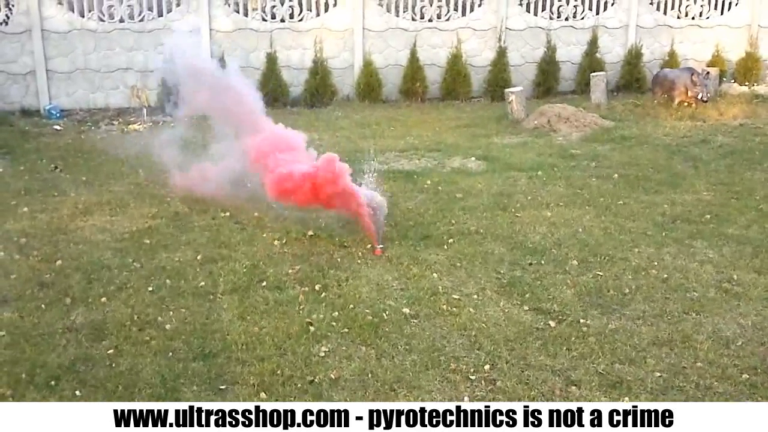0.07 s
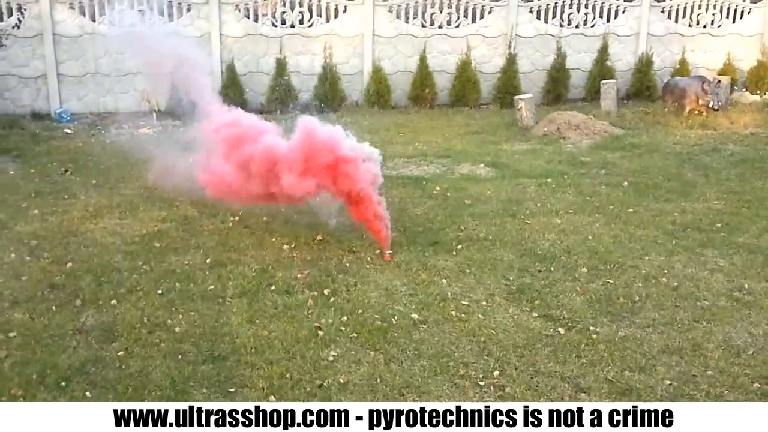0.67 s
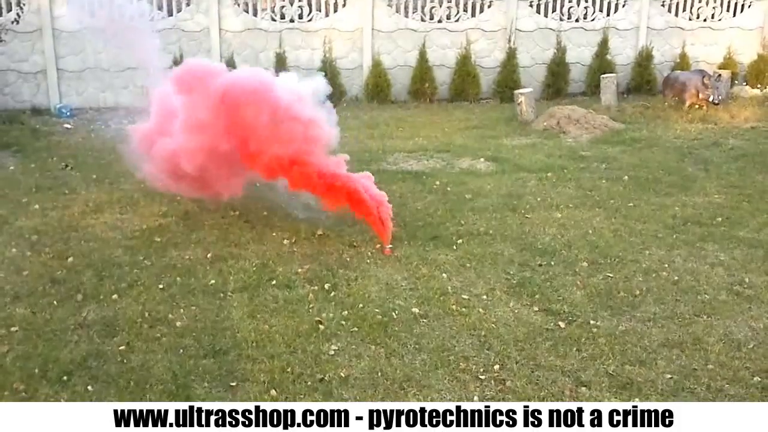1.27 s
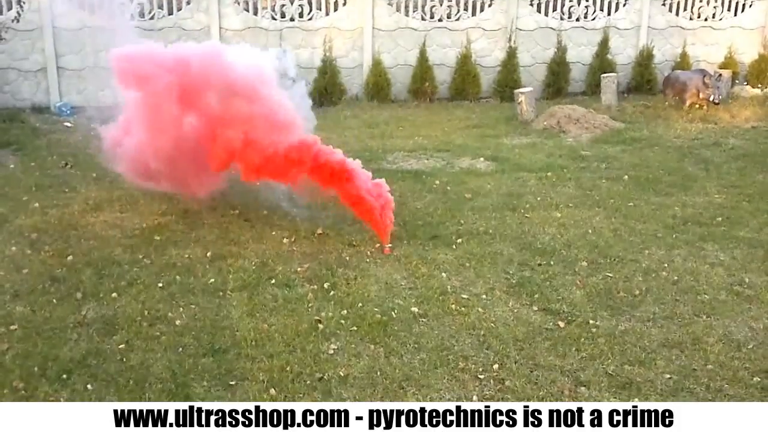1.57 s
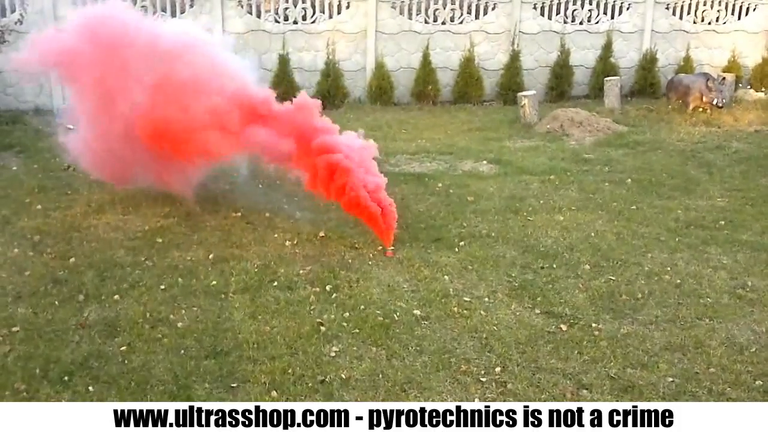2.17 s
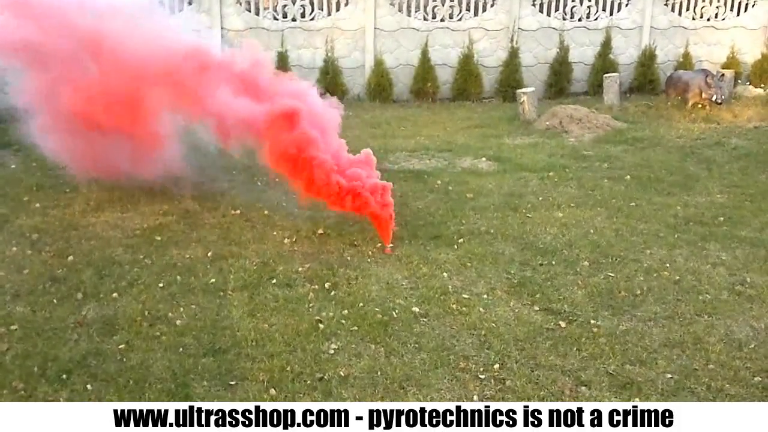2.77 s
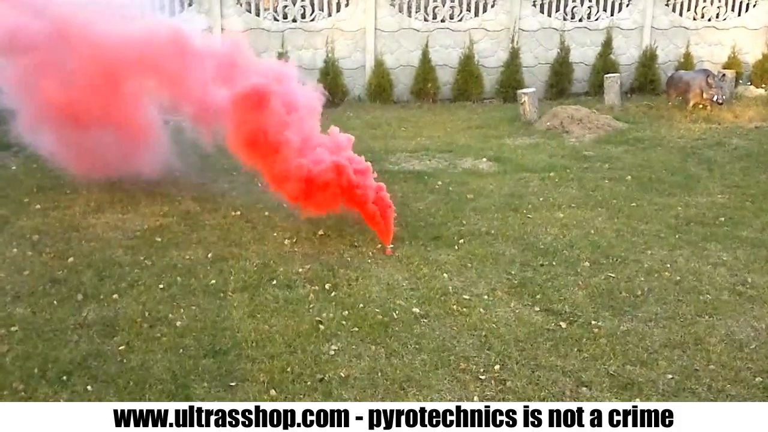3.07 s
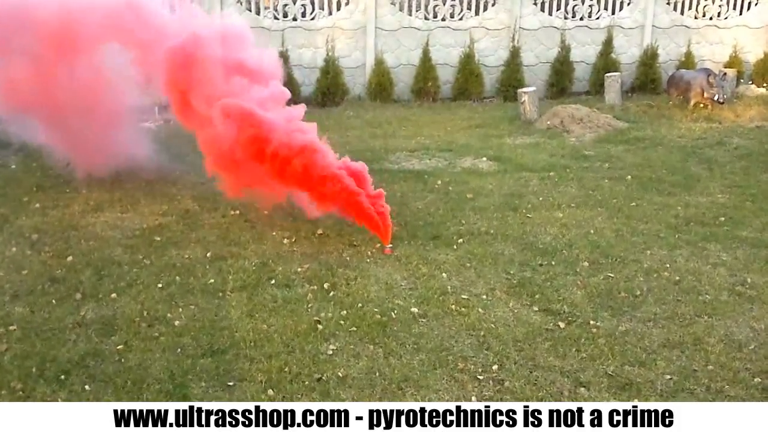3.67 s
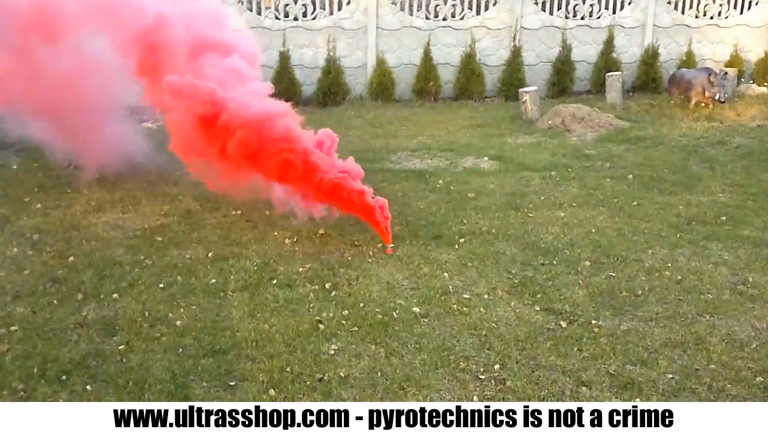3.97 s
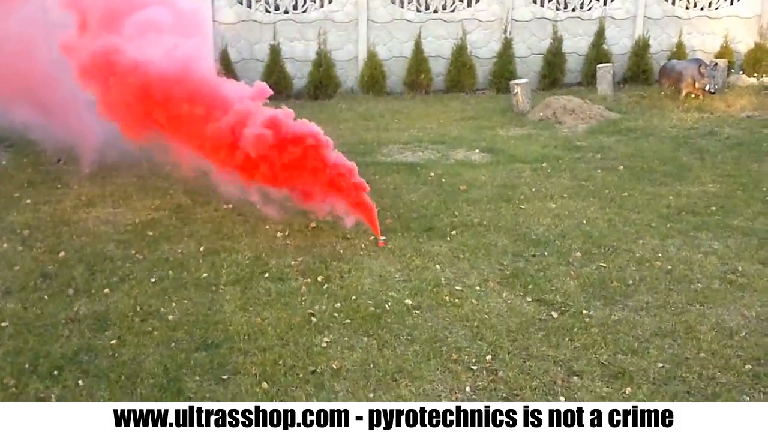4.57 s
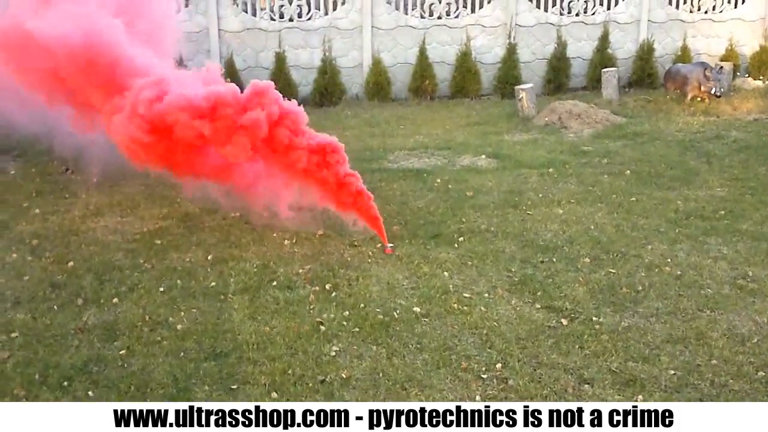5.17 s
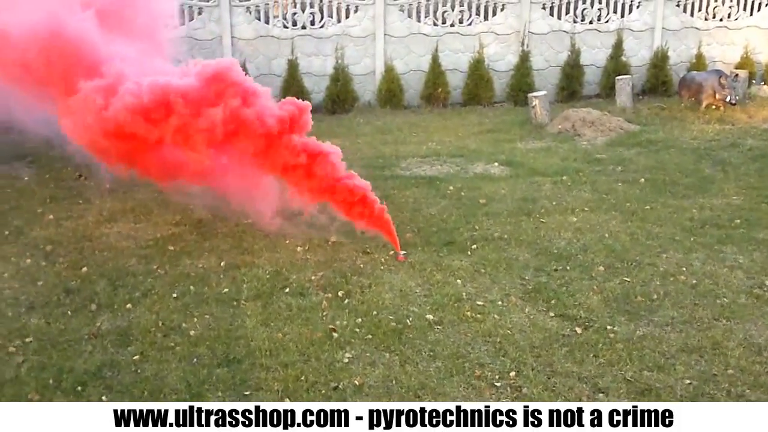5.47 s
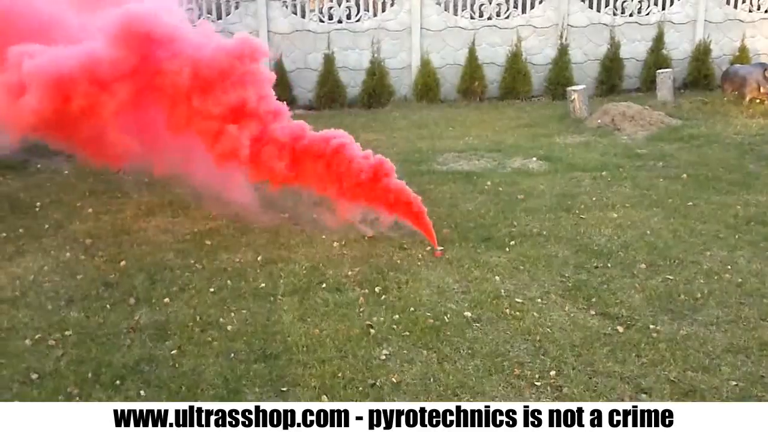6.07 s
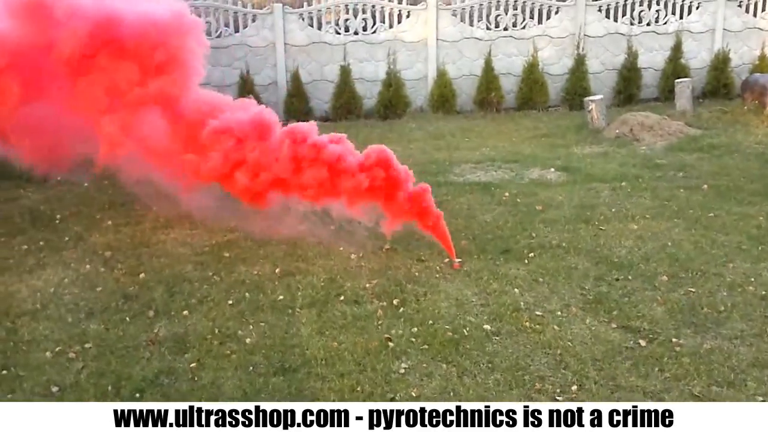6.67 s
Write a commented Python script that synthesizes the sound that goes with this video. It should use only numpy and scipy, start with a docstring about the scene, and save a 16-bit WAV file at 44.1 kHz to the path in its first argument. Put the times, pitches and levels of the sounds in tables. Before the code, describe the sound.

Outdoors in a light breeze, a smoke bomb fizzes sharply, fades to faint spurts, then starts a steady, rushing hiss.

```python
"""A garden lawn, with a smoke bomb burning a few metres from a stereo microphone.
Its priming flares with a bright rush and dies into a thin, sputtering hiss in the vent hole;
then the charge builds pressure and the smoke jets out steadily. Garden walls send back faint echoes,
and a breeze bumps the two microphone ports over far traffic and a low, wavering hum near 57 Hz."""
import sys
import numpy as np
from scipy import signal
from scipy.fft import rfft, irfft
from scipy.io import wavfile
from scipy.ndimage import uniform_filter1d

SR = 44100
rng = np.random.default_rng(int(sys.argv[2]) if len(sys.argv) > 2 else 0)


def pcm_store(signal):
    """Save signal as 16-bit PCM."""
    levels = np.round(np.clip(np.atleast_2d(signal), -1, 1) * 32767)
    wavfile.write(sys.argv[1], SR, levels.astype(np.int16).T)


N = 305172
SIZE, HOP = 1024, 256  # spectral frame and step, in samples
HZ = np.fft.rfftfreq(SIZE, 1 / SR)
TIMES = np.arange(N // HOP + 5) * HOP / SR
SURGE_RISE_DB_PER_S = 97  # the priming's surge and the vent's ring share this attack

# the band in which burning gas roars: f/Hz, half width/Hz, weight
ROAR_BAND = [(646, 620, 1)]
# the jet is weaker at the right port: f/Hz, gain/dB
JET_RIGHT = [(200, -7), (900, -9), (2000, -8.5), (3700, -7), (4900, -3.5), (6000, -8.5), (7000, -3.5),
             (8200, -9)]


def jet(hole_db=7.5, hole_width_hz=440, widening_hz=130, sputter_db=.34):
    """The full jet: wide hiss that rings the hole and sharpens with pressure, over a surging roar."""
    # tone of the jet: f/Hz, level/dB
    spectrum = [(60, -7.5), (330, -3.5), (800, 0.3), (1400, 2.5), (2400, 2.5), (3600, -0.5), (5100, 0.5),
                (5900, -4), (7000, -12), (8500, -18), (11800, -17.5), (12600, -49), (15000, -26.5)]
    # the uneven burn surges and slackens: t/s, half width/s, hiss/dB, roar/dB
    surges = [(4.2, 0.034, -0.5, -1.5), (4.322, 0.022, 0.5, -1), (4.44, 0.039, -0.1, 3.5),
              (4.68, .03, 0, -1.5), (4.93, 0.033, 0, 4.5), (5.07, 0.022, -0.5, 0.5), (5.16, 0.058, 1.5, 5),
              (5.26, .03, 1.5, -2), (5.417, 0.049, 1, 3.5), (5.86, .1, 1, -1), (6.017, 0.023, 1.6, 3.5),
              (6.13, 0.052, 1, 0.5), (6.3, 0.038, 0, 3), (6.514, 0.04, 0.3, -6.5), (6.756, .05, 0.5, 2.5)]
    # the hole's ring under the jet: t/s, f/Hz
    hole_pitch = [(4.3, 3700), (4.55, 3620), (4.8, 3300), (5.3, 3420), (5.7, 3520), (5.95, 3550),
                  (6.4, 3600), (6.7, 3650), (6.87, 3830)]
    built = np.interp(TIMES, [4.28, 5.9], [0, 1])[:, None]
    pressure = built + .62 * bell(4.31, .15)  # pent-up pressure escapes as the jet opens
    level_db = -44.5 + 3.5 * built + held(4.205, 6.82, rise_db_per_s=186, fall_db_per_s=56)
    level_db += sum(hiss * bell(s, width) for s, width, hiss, _ in surges)
    level_db += sputter_db * flutter(6, 45)
    hole_hz = np.interp(TIMES, *np.transpose(hole_pitch))[:, None]
    ring = bumps([(hole_hz, hole_width_hz + widening_hz * built, hole_db * pressure)])
    edge = bumps([(4950, 480, 3 * built), (6100, 650, 6.5 * built)])
    roar_db = sum(roar * bell(s, width) for s, width, _, roar in surges) + .6 * flutter(5, 20)
    colour = curve(spectrum) + ring + edge + roar_db * bumps(ROAR_BAND)
    colour += dulling(level_db, full_db=-45, slope=.4)
    return turbulence(colour, level_db, right_db=curve(JET_RIGHT), patchy_db=1.1, focus=1.03)


def flare(fall_db_per_s=70, flicker_db=.46, spit_db=1, fizz_db=2, roar_db=6):
    """The priming burns fiercely, gulps, surges once and dies away; tiny spits roughen its rush."""
    # tone of the burning priming: f/Hz, level/dB
    spectrum = [(60, -15.5), (330, -14.5), (800, -7.5), (1400, -9.5), (2400, -8), (3600, -0.5),
                (4800, -2.5), (6300, -17), (8500, -20.5), (12200, -25.5), (12900, -75)]
    # upper resonance of the opening fizz: f/Hz, half width/Hz, weight
    fizz_ring = [(4700, 270, 0.65)]
    # the last embers flare up: t/s, level/dB
    embers = [(.85, -49), (.925, -53)]
    burn_db = -32.5 + fading(.27, fall_db_per_s)
    surge_db = -27 + held(.41, .46, SURGE_RISE_DB_PER_S, fall_db_per_s)
    embers_db = [db + held(s, s, 155, 155) for s, db in embers]
    level_db = np.max([burn_db, surge_db, *embers_db], axis=0)
    colour = curve(spectrum) + dulling(level_db, full_db=-39, slope=.55)
    treble = HZ ** 8 / (HZ ** 8 + 4420 ** 8)
    fizz = fizz_db * bell(.071, .15) * (treble + bumps(fizz_ring))
    catch = bell(.13, .036) - bell(.058, .036)  # the roar ducks, then swells as the priming catches
    roar = roar_db * catch * bumps(ROAR_BAND)
    level_db += flicker_db * flutter(20, 70)
    rush = turbulence(colour + fizz + roar, level_db, right_db=-3.5, patchy_db=1, focus=1.08)
    spits = noise(lambda f: lowpass_db(f, 400))
    gulp_db = -3 * np.exp(-((np.arange(N) / SR - .362) / .0036) ** 2)
    return rush * gain_of(gulp_db - spit_db * spits)


def vent(leak_db=-71.5, full_flow_db=-55, flicker_db=.45):
    """A weak, uneven flow sounds the hole's broad resonance; it chokes, clogs and comes in spurts."""
    # resonance of the hole at full flow: f/Hz, level/dB
    spectrum = [(300, -14), (1500, -23), (2600, -20), (3050, -10), (3450, -2.5), (3720, 0.5), (4150, -7),
                (4650, -21), (5100, -34), (9000, -47)]
    # slag blocks the hole for a moment: t/s, depth/dB
    chokes = [(1.11, 6.5), (1.21, 3.5), (2.04, 9), (2.11, 11)]
    # gas breaks through the slag: t/s, level/dB, attack/(dB per s)
    spurts = [(2.15, -46, 600), (2.59, -57.5, 300), (2.798, -54, 148), (2.93, -61.5, 150),
              (3.24, -63.5, 90), (3.32, -61, 120), (3.38, -62.5, 90)]
    ring_db = -39.5 + held(.49, .64, SURGE_RISE_DB_PER_S, fall_db_per_s=88)
    hiss_db = -50.5 + fading(1.9, 10) + fading(2.502, 280)  # slag narrows the hole, then clogs it
    hiss_db -= sum(db * bell(s, .028) for s, db in chokes)
    spurts_db = [db + held(s, s, rise, fall_db_per_s=480) for s, db, rise in spurts]
    level_db = np.maximum(np.max([ring_db, hiss_db, *spurts_db], axis=0), leak_db)
    pitch = 1 + .005 * np.minimum(level_db - full_flow_db, 0)  # the ring goes flat in a weak flow
    level_db += flicker_db * flutter(7, 60)
    return turbulence(curve(spectrum, HZ / pitch), level_db, right_db=-5, patchy_db=2, focus=.85)


def puff(start_s=.522, attack_s=.0017, decay_s=.017, dull_hz=1800):
    """One dull spurt as the priming gives out."""
    age = np.maximum(np.arange(N) / SR - start_s, 0)
    level_db = np.full((len(TIMES), 1), -32)
    gas = turbulence(lowpass_db(HZ, dull_hz), level_db, right_db=-3, patchy_db=1, focus=1.1)
    return gas * np.minimum(age / attack_s, 1) * np.exp(-age / decay_s)


def opening(give_way_s=4.18, fall_db_per_s=120):
    """A thin leak grows and the first smoke wells up; both give way to the jet."""
    # the thin, high leak: f/Hz, level/dB
    leak_colour = [(1000, -30), (1700, -4), (2200, 0), (2900, -16), (4000, -6), (5000, -7), (6000, -4),
                   (7500, -14), (12000, -19)]
    # the dull rush of welling smoke: f/Hz, level/dB
    well_colour = [(150, -10), (480, 0), (900, -5), (1300, -7), (2150, -6), (3200, -16), (7000, -33)]
    leak_db = -66 + held(3.97, give_way_s, 30, fall_db_per_s)
    well_db = -56 + held(4.1, give_way_s, 90, fall_db_per_s)
    return sum(turbulence(curve(colour), level_db, right_db=curve(JET_RIGHT), patchy_db=0, focus=1)
               for colour, level_db in [(leak_colour, leak_db), (well_colour, well_db)])


def walls(x):
    """Single echoes off the ground and the garden walls comb the hiss."""
    # reflections: delay/s, gain/dB
    echoes = [(.00174, -18), (.0025, -20), (.0142, -15), (.0155, -14), (.0376, -17.5)]
    return x + sum(gain_of(db) * np.pad(x, ((0, 0), (round(s * SR), 0)))[:, :N] for s, db in echoes)


def wind(buffet_boost_db=3, right_db=-5, lumpy_db=4.5):
    """Eddies strike one port at a time over a lumpy breeze that rises to one gust and eases."""
    # strong buffets: t/s, half width/s, level before boost/dB, eddy f/Hz, port (+1 left, -1 right)
    buffets = [(0.01, 0.038, -36.5, 65.6, 1), (0.09, 0.05, -38, 61.4, -1), (0.121, 0.033, -31, 50.7, 1),
               (0.176, 0.029, -36.5, 65, 1), (0.226, 0.041, -29, 80, 1), (0.277, 0.026, -29, 80.5, 1),
               (0.551, 0.03, -44, 62, -1), (.925, 0.024, -42, 55, 1), (0.992, 0.024, -39.5, 64, 1),
               (1.039, 0.029, -40.5, 44, -1), (1.335, 0.035, -41.5, 72, -1), (1.567, 0.035, -38, 66, 1),
               (1.644, 0.028, -39, 64, 1), (1.84, .035, -43, 66.5, 1), (1.975, 0.027, -36.5, 54, 1),
               (2.239, 0.026, -45, 55, -1), (2.338, 0.025, -43, 68, 1), (2.599, 0.04, -43, 50.3, 1),
               (2.753, 0.038, -42.5, 47.7, 1), (2.924, .025, -42, 58, 1), (3.1, 0.029, -43, 62, 1),
               (3.504, .036, -42, 70, 1), (4.207, .035, -45, 46, 1), (4.55, .03, -44, 48, 1),
               (4.827, 0.04, -36.5, 50.3, 1), (5.124, 0.025, -40.5, 58, 1), (5.31, 0.024, -42, 55, 1),
               (5.495, 0.022, -39, 69.6, 1), (5.637, 0.021, -43, 71, 1), (5.698, 0.027, -39.5, 48, 1),
               (6.148, 0.03, -44.5, 56, 1), (6.467, 0.034, -41, 74, 1), (6.797, 0.041, -32.5, 42, 1),
               (6.869, 0.032, -43.5, 70, 1)]
    # rumble of a 75 Hz eddy: f/Hz, level/dB
    rumble = [(15, -15), (40, 0), (75, 4.5), (120, -7.5), (200, -17), (350, -28.5), (800, -40.5),
              (2500, -99)]
    t, out = np.arange(N) / SR, np.zeros((2, N))
    for s, width, db, eddy_hz, side in buffets:
        near = np.flatnonzero(abs(t - s) < 1.2 * width)
        swell = np.exp(-abs(1.38 * (t[near] - s) / width) ** 3)
        eddy = noise(lambda f: curve(rumble, f * 75 / eddy_hz), size=32768)
        buffet = unit_rms(swell * eddy[:len(near)]) * np.sqrt(np.mean(swell ** 2))
        out[int(side < 0), near] += gain_of(db + buffet_boost_db) * buffet
    breeze_db = -61 + 8.5 * bell(1.7, .77)
    for port, db in enumerate([0, right_db]):
        lumps_db = per_sample(breeze_db + lumpy_db * flutter(1.3, 13))
        out[port] += gain_of(db + lumps_db) * noise(lambda f: curve(rumble, f))
    return out


def thumps():
    """Small, tight eddies slap the left port: a dip of pressure between two soft rebounds."""
    # wind slaps: t/s, level before rounding/dB, width/s, rounding of the tip/s
    slaps = [(.207, -16, 0.0022, .0009), (.241, -14, 0.0029, .0009), (1.528, -23, 0.0039, .0022),
             (1.967, -18.5, .0036, 0.0035), (2.331, -32.5, 0.0014, .0008), (5.316, -25, .0028, .0022),
             (5.49, -32, 0.003, .0015), (5.635, -22.5, 0.0027, 0.0008), (6.467, -24, 0.0025, 0.0018),
             (6.792, -22, 0.0035, .0034)]
    t, out = np.arange(N) / SR, np.zeros((2, N))
    for s, db, width, tip in slaps:
        rounding = np.exp(-((np.arange(1025) - 512) / SR / tip) ** 2)
        offset = abs(t - s) / width
        slap = (offset - 1) * np.exp(-offset)
        out[0] += gain_of(db) * signal.oaconvolve(slap, rounding / rounding.sum(), "same")
    return out


def yard(level_db=-55):
    """A nearly steady bed of far traffic and air."""
    # tone of the open air: f/Hz, level/dB
    spectrum = [(20, -16), (45, 2), (80, -4.5), (130, -11.5), (200, -11), (350, -14.5), (800, -15.5),
                (1400, -16), (2400, -21), (3600, -27.5), (6000, -30), (8500, -33.5), (12000, -33.5),
                (13600, -47), (14200, -53)]
    swell_db = .35 * flutter(.3, 5)
    return turbulence(curve(spectrum), level_db + swell_db, right_db=-4, patchy_db=1.64,
                      focus=.88, direct=.74)


def hum(centre_hz=57, width_hz=7, right_db=-4.5):
    """A low, wavering hum of narrow-band noise, stronger on the left."""
    # the hum's fader ride: t/s, level/dB
    ride = [(0, -51.5), (2.2, -50.5), (3.0, -52), (3.45, -47.5), (3.85, -56), (4.15, -52.5), (4.5, -51),
            (6.9, -52)]
    shared, left, right = (noise(lambda f: -20 * np.log10(1 + ((f - centre_hz) / width_hz) ** 2))
                           for _ in range(3))
    level_db = np.interp(np.arange(N) / SR, *np.transpose(ride))
    return gain_of([level_db, level_db + right_db]) * unit_rms(shared + np.array([left, right]) / 2)


def turbulence(colour_db, level_db, right_db, patchy_db, focus, direct=1):
    """Patchy rushing noise at the two ports; focus scales their likeness, direct their colouring."""
    # peaks and dips of the left port: f/Hz, half width/Hz, gain/dB
    left_eq = [(970, 170, 2.5), (1234, 250, -4.5), (1737, 56, 2.5), (2605, 243, -5), (2928, 41, 5.5),
               (3306, 145, 3), (4340, 500, -1), (4760, 145, 5.5), (5120, 8.6, 3), (5870, 52, 6.5),
               (6880, 100, 2), (7850, 150, 0.5)]
    # peaks and dips of the right port: f/Hz, half width/Hz, gain/dB
    right_eq = [(830, 130, 2), (1180, 80, -4), (1830, 800, -7), (2370, 190, 3), (3040, 330, -10),
                (4200, 480, 2), (5850, 90, -5), (7500, 500, 4), (10200, 1200, -9)]
    # how alike the ports sound at focus 1: f/Hz, coherence
    likeness = [(400, .85), (900, .8), (1450, .44), (2450, .78), (3030, .3), (3300, .7), (3650, .86),
                (4380, .3), (4650, .78), (5000, .7), (5400, .33), (6200, .62), (7300, .33), (8500, .15)]
    # the left port's lead: f/Hz, phase/rad
    lead = [(500, 0), (1000, .6), (1550, .7), (2400, -.7), (2900, -3.1), (3080, .15), (3750, .1),
            (4150, 1.0), (4520, 4.15), (5000, 4.2), (5700, 7), (7200, 9.2)]
    left_re, left_im, apart_re, apart_im, patches = rng.standard_normal((5, len(TIMES), len(HZ)))
    patches = uniform_filter1d(patches, size=9, axis=0)  # smear in time, then in frequency
    patches = unit_rms(uniform_filter1d(patches, size=14, axis=1))
    coherence = np.clip(focus * curve(likeness), 0, .98)
    left, apart = left_re + 1j * left_im, apart_re + 1j * apart_im
    right = (coherence * left + np.sqrt(1 - coherence ** 2) * apart) * np.exp(-1j * curve(lead))
    left_port = gain_of(direct * bumps(left_eq))
    right_port = gain_of(direct * bumps(right_eq) + right_db)
    colour = gain_of(colour_db)
    colour /= np.linalg.norm(colour * left_port, axis=-1, keepdims=True)  # tone leaves the level alone
    spectra = np.array([left * left_port, right * right_port]) * colour * gain_of(patchy_db * patches)
    pair = signal.istft(spectra.transpose(0, 2, 1), nperseg=SIZE, noverlap=SIZE - HOP)[1][:, :N]
    return pair / pair[0].std() * gain_of(per_sample(level_db))


def noise(colour, size=N):
    """Noise of rms 1 whose spectrum in dB is the function colour(hz)."""
    white = rfft(rng.standard_normal(size))
    return unit_rms(irfft(white * gain_of(colour(np.fft.rfftfreq(size, 1 / SR))), size))


def dulling(level_db, full_db, slope, corner_hz=4000):
    """Slower gas loses its treble first: a shelf in dB that follows the level."""
    return slope * np.minimum(level_db - full_db, 0) * HZ ** 6 / (HZ ** 6 + corner_hz ** 6)


def lowpass_db(hz, corner_hz):
    """A roll-off of 18 dB per octave."""
    return -10 * np.log10(1 + (hz / corner_hz) ** 6)


def curve(points, hz=HZ):
    """Joins a table's points on a log-frequency axis."""
    f, value = np.transpose(points)
    return np.interp(np.log(hz + 1), np.log(f + 1), value)


def bumps(rows):
    """Bell-shaped EQ peaks and dips."""
    return sum(height * np.exp(-((HZ - hz) / width) ** 2) for hz, width, height in rows)


def flutter(slow_hz, fast_hz):
    """Random wavering of rms 1, one value a frame."""
    rates = np.geomspace(slow_hz, fast_hz, num=30)
    return unit_rms(sum(np.sin(2 * np.pi * (f * TIMES + rng.random())) for f in rates))[:, None]


def held(start_s, end_s, rise_db_per_s, fall_db_per_s):
    """Attack, hold and release: 0 dB from start to end, one value a frame."""
    return -rise_db_per_s * np.maximum(start_s - TIMES[:, None], 0) + fading(end_s, fall_db_per_s)


def fading(start_s, db_per_s):
    """0 dB until the start, then a steady fall."""
    return -db_per_s * np.maximum(TIMES[:, None] - start_s, 0)


def bell(centre_s, width_s):
    """A smooth rise to 1 and back, one value a frame."""
    return np.exp(-((TIMES[:, None] - centre_s) / width_s) ** 2)


def per_sample(frames):
    """Brings a frame envelope up to audio rate."""
    return np.interp(np.arange(N) / SR, TIMES, frames[:, 0])


def gain_of(db):
    """Decibels to gain."""
    return 10 ** (np.asarray(db) / 20)


def unit_rms(x):
    """Scales to rms 1."""
    return x / np.sqrt(np.mean(abs(x) ** 2) + 1e-20)


def scene():
    """The smoke bomb and its echoes over the garden's ambience, a low hum and wind."""
    smoke_bomb = flare() + puff() + vent() + opening() + jet()
    return walls(smoke_bomb) + yard() + hum() + wind() + thumps()


def record(dry, edge_hz=15300):
    """A steep band limit takes off the very top."""
    lowpass = signal.firwin(511, edge_hz, window=("kaiser", 9), fs=SR)
    return signal.oaconvolve(dry, lowpass[None], "same")


dry = scene()
out = record(dry)
pcm_store(out)
```